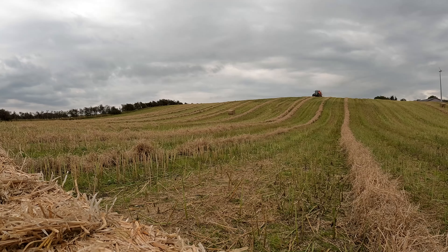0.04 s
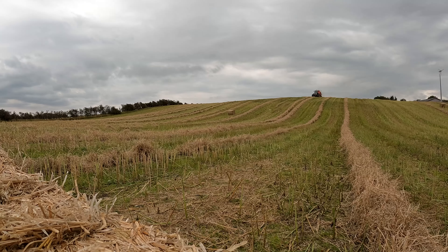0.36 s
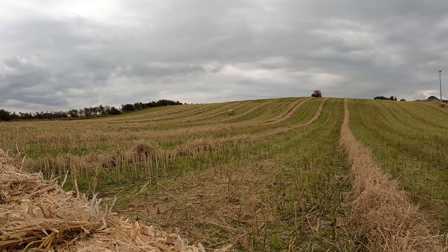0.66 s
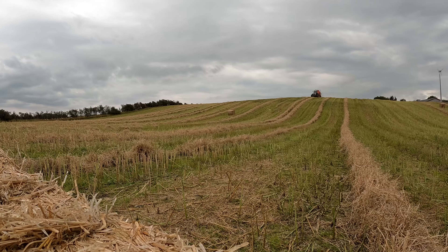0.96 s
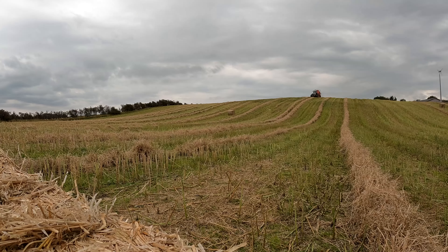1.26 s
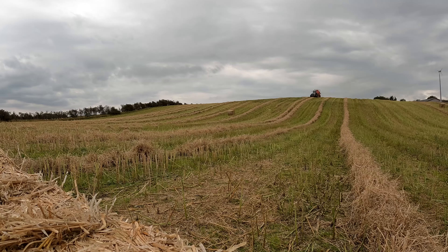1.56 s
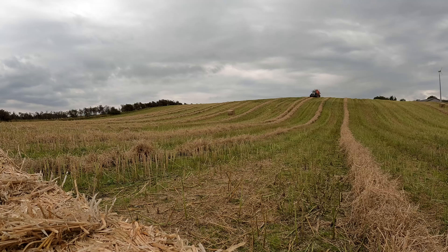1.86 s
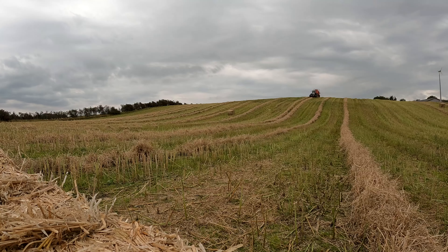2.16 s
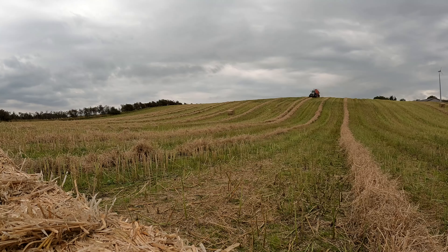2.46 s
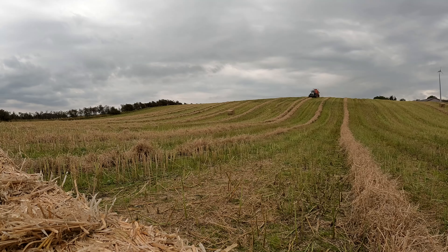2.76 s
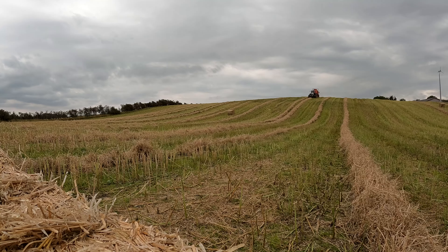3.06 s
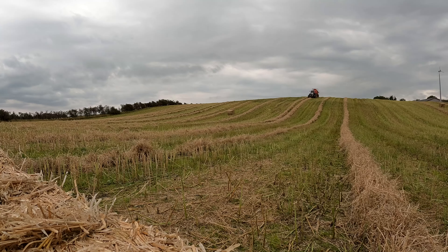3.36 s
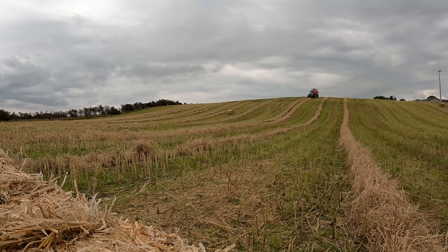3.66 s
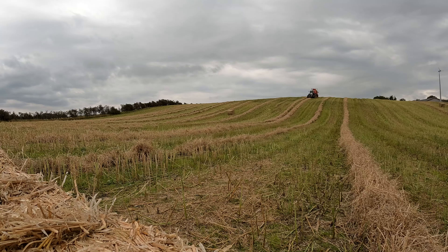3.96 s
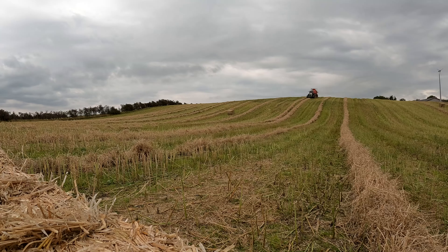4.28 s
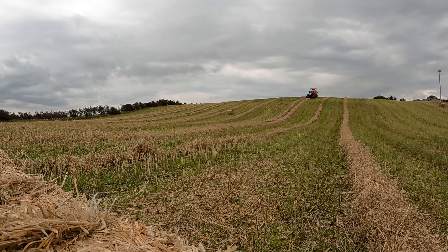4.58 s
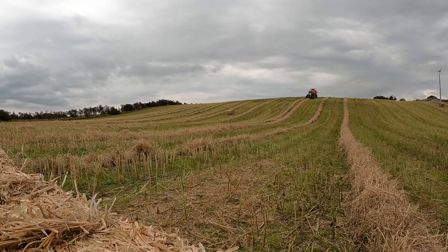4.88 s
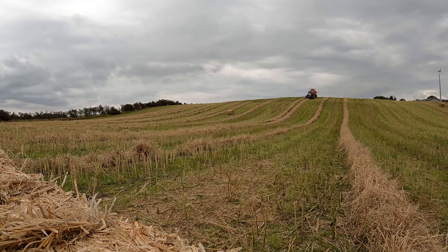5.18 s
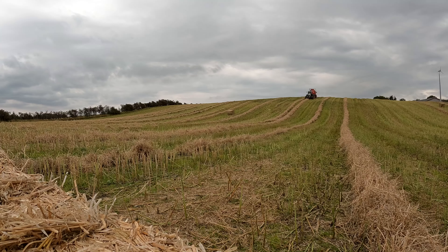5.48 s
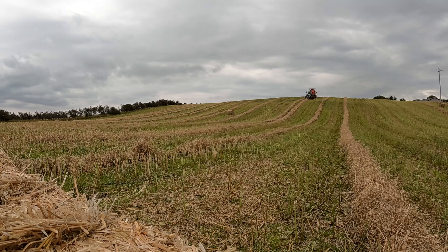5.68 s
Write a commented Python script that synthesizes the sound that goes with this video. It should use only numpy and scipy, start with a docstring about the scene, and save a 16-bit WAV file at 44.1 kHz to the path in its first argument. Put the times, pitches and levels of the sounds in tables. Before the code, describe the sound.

Across a breezy field, a tractor engine labours, eases and labours again, while the baler behind it rattles and swishes through dry straw.

```python
"""A six-cylinder diesel tractor hauls a baler up a stubble field, some way off. From the start its firings make
the exhaust drone and shake the metalwork, straw rustles in the pickup, and wind thumps softly on the
microphone. Near 0.4 s the load drags the speed down: the block knocks, the exhaust barks. By 4 s the engine
runs almost free, knock has given way to rattle, and thin high tones whistle faintly now and then. Around 7 s,
with the breeze dying down, the engine labours again."""
import sys
import numpy as np
from scipy import signal
from scipy.fft import rfft, irfft, next_fast_len
from scipy.io import wavfile
from scipy.ndimage import uniform_filter1d, map_coordinates

SR = 44100
rng = np.random.default_rng(int(sys.argv[2]) if len(sys.argv) > 2 else 0)


def materialize(psi):
    """Save the field psi as 16-bit PCM at rate SR to the path in sys.argv[1].

    A 1-D psi becomes a single channel; in a 2-D psi each row is a channel.
    """
    bounded = np.clip(np.atleast_2d(psi).T, -1, 1)
    quanta = np.round(bounded * 32767).astype(np.int16)
    wavfile.write(sys.argv[1], SR, quanta)


N = 341334

# swell of the machine's midrange as the air carries it: t/s, relative level/dB
BODY_LEVEL = [(0.0, -39), (1.01, -35.5), (2.76, -37.5), (4.12, -40.5), (5.33, -34.5), (6.7, -34.5),
              (7.26, -34.5), (7.41, -34.5), (7.74, -35.5)]
# rides on the machine's treble and the straw's swish: t/s, relative treble/dB, relative straw/dB
TOP_LEVELS = [(0.06, -44, -60), (0.25, -46, -61.5), (0.55, -42, -55.5), (0.82, -45, -53.5),
              (1.2, -46.5, -62.5), (1.4, -47, -59.5), (1.66, -47, -62), (1.99, -39.5, -57.5),
              (2.4, -48.5, -64), (2.7, -46, -61), (2.9, -44, -62), (3.2, -40.5, -60), (3.59, -51, -67.5),
              (4.19, -52.5, -67), (4.95, -50, -58.5), (5.44, -43, -57.5), (5.8, -46.5, -58),
              (6.14, -45.5, -55), (6.8, -45, -60), (7.15, -42, -57), (7.46, -45.5, -61.5),
              (7.7, -41, -56.5)]


def amp(db):
    """Decibels to gain."""
    return np.exp(np.asarray(db) * (np.log(10) / 20))


def unit(x):
    """x at rms 1."""
    return x / np.sqrt(np.mean(x ** 2) + 1e-20)


def curves(rows):
    """One value per sample for each column after the time."""
    s, *cols = np.transpose(rows)
    return [np.interp(np.arange(N) / SR, s, c) for c in cols]


def wobble(rate):
    """A smooth random curve, rate knots a second."""
    knots = rng.standard_normal(int(N * rate / SR) + 4)
    grid = np.arange(0, len(knots), 1 / 10)
    return np.interp(np.arange(N) * rate / SR, grid, map_coordinates(knots, [grid], mode="mirror"))


def around(s, half):
    """The samples that a swell at time s covers."""
    return slice(max(int((s - 3 * abs(half)) * SR), 0), int((s + 3 * abs(half)) * SR) + 1)


def swell(s, half):
    """A bell-shaped envelope that peaks at 1 at time s."""
    shape, span = np.zeros(N), around(s, half)
    shape[span] = np.exp(-((np.arange(*span.indices(N)) / SR - s) / half) ** 2)
    return shape


def filtered(x, response):
    """x through a frequency response."""
    m = next_fast_len(N + SR // 2)
    return irfft(rfft(x, m) * response(np.fft.rfftfreq(m, 1 / SR)), m)[:N]


def coloured(x, points):
    """x through an EQ of (f/Hz, level/dB) points on a log axis, at rms 1."""
    f, db = np.transpose(points)
    return unit(filtered(x, lambda hz: amp(np.interp(np.log(hz + 1), np.log(f + 1), db))))


def resonate(x, modes):
    """x ringing in (f/Hz, width/Hz, level/dB) resonances with deep valleys between, at rms 1."""
    peak = lambda f, c, w: 1 / (1 + ((f - c) / w) ** 2) ** 2
    return unit(filtered(x, lambda f: np.sqrt(sum(amp(db) ** 2 * peak(f, c, w) for c, w, db in modes))))


def ring(drive, hz, width_hz):
    """drive ringing in one resonance whose pitch may wander, at rms 1."""
    carrier = np.exp(2j * np.pi * np.cumsum(np.broadcast_to(hz, len(drive))) / SR)
    pole = np.exp(-2 * np.pi * abs(width_hz) / SR)
    envelope = signal.lfilter([1], [1, -2 * pole, pole ** 2], drive * carrier.conj())
    return unit((envelope * carrier).real)


def engine_load(speed, free_hz=39.24, droop_hz=2.84):
    """The governor gives more fuel the further the speed sags: 0 running free, 1 at full load."""
    return np.tanh(np.maximum(free_hz - speed, 0) / droop_hz)


def lugging(speed, lug_hz=34.2, span_hz=.15):
    """0 while the engine keeps up, abruptly 1 once it is dragged below lug_hz and labours."""
    return .5 + .5 * np.tanh((lug_hz - speed) / span_hz)


def tone(turns, multiple, flutter_db, drift):
    """One engine order near rms 1, a little unsteady in level and phase."""
    phase = multiple * turns + rng.random() + drift * wobble(9)
    return np.sqrt(2) * np.sin(2 * np.pi * phase) * amp(flutter_db * wobble(7))


def exhaust(turns, speed):
    """Three firings a turn drone, louder under load; unequal cylinders growl and the stack puffs."""
    # the firing tone's octave: t/s, level/dB
    octave_level = [(0, -64), (1.2, -54), (1.75, -48), (3.3, -48), (4.6, -49.5), (5.4, -48), (6.1, -47),
                    (6.7, -45), (7.74, -47.5)]
    # the seventh order's hum: t/s, level/dB
    hum_level = [(0, -56), (0.5, -57), (0.8, -50.5), (2.0, -59), (3.0, -56), (4.2, -61), (5.4, -57),
                 (6.2, -59), (6.7, -51), (7.05, -50), (7.35, -43.5), (7.74, -43.5)]
    # tones of the unequal cylinders: multiple of the shaft speed, relative level/dB
    uneven_orders = [(2, -5.5), (2.5, -15), (3.5, -44), (4, -31), (4.5, -33), (5, -9.5), (5.5, -21),
                     (6.5, -29.5), (7.5, -18), (8, -11), (9, -10), (10.5, -24.5), (11, -5), (11.5, -12.5),
                     (12, -6), (13, -7), (13.5, -9), (14, -21), (15, -18), (16.5, -8.5), (17.5, -9),
                     (18.5, -14)]
    # exhaust pipe resonances: f/Hz, width/Hz, boost/dB
    pipe_modes = [(249, 15, 8), (436, 14, 9)]
    # colour of the puffs from the stack: f/Hz, relative level/dB
    puff_eq = [(70, -25), (130, -5), (180, -2), (260, -3), (320, -11), (420, 0), (650, -12), (1200, -40),
               (2500, -120)]
    load, bark = engine_load(speed), lugging(speed)
    body_db = curves(BODY_LEVEL)[0]
    swell_db = body_db - body_db.mean()

    firing_db = -50 + 9.5 * load + .97 * np.arange(N) / SR  # grows as the tractor draws on
    silencer_db = 14.5 / (1 + ((10 * speed - 380.2) / 20.3) ** 2)  # its resonance lifts the tenth order
    boom_db = -58 + .65 * swell_db + silencer_db
    octave_db, hum_db = curves(octave_level)[0], curves(hum_level)[0]
    firing, octave, hum, boom = [tone(turns, k, flutter_db=.8, drift=.003) for k in (3, 6, 7, 10)]
    drone = amp(firing_db) * firing + amp(octave_db) * octave + amp(hum_db) * hum + amp(boom_db) * boom

    growl_db = -57.5 + 12.5 * load + .72 * swell_db + 3 * bark
    push = amp(.5 * (firing_db + 37))  # the low orders swell with the exhaust pressure
    orders = [(k, amp(db) * tone(turns, k, flutter_db=1.2, drift=.02)) for k, db in uneven_orders]
    growl = amp(growl_db) * sum(line * push if k < 10 else line for k, line in orders)
    pipe = lambda f: amp(sum(db / (1 + ((f - c) / w) ** 2) for c, w, db in pipe_modes))

    puff_db = -55 + 7.5 * bark + .72 * swell_db
    puffs = coloured(rng.standard_normal(N) * amp(-26 * (turns % 1)), puff_eq)  # one each turn
    return drone + filtered(growl, pipe) + amp(puff_db) * puffs


def bursts(turns, depth_db, uneven_db):
    """Noise that surges at each firing and dies within the stroke, swelling once a turn."""
    stroke = (3 * turns + rng.random()) % 1
    return rng.standard_normal(N) * unit(amp(uneven_db * np.cos(2 * np.pi * turns) - depth_db * stroke))


def machinery(turns, speed):
    """Knock takes over from free rattle as the load grows; gusts fade the treble in and out."""
    # engine block and panels under load: f/Hz, width/Hz, relative level/dB
    block_modes = [(407, 18, 5), (536, 69, 0.5), (733, 58, -3), (1163, 133, -3), (1460, 130, -8.5),
                   (1720, 62, -2.5), (2175, 220, -9.5), (2790, 83, -11)]
    # gears, chains and covers running freely: f/Hz, width/Hz, relative level/dB
    cover_modes = [(390, 113, 0.5), (536, 38, 9), (727, 140, 2.5), (1174, 250, -2.5), (1594, 100, -4),
                   (2130, 200, -4), (2444, 130, -4)]
    # broad wash between the resonances: f/Hz, relative level/dB
    wash_eq = [(50, -29), (90, 9), (180, 11.5), (260, -9.5), (320, -41), (450, 8), (800, -20), (1500, -5),
               (1900, -16), (2700, -2), (3500, -1), (4200, -8), (5300, -8), (6100, -8), (9000, -37)]
    body_db, treble_db = curves(BODY_LEVEL)[0], curves(TOP_LEVELS)[0]
    knock_share = np.clip((engine_load(speed) - .26) / .74, .08, .95)
    knock = resonate(bursts(turns, depth_db=8.5, uneven_db=1), block_modes)
    rattle = resonate(bursts(turns, depth_db=3, uneven_db=-1), cover_modes)
    wash = coloured(bursts(turns, depth_db=4, uneven_db=2.1), wash_eq)
    clatter = np.sqrt(knock_share) * knock + np.sqrt(1 - knock_share) * rattle
    noise = clatter + amp(-5.5) * wash + amp(-6) * combustion(turns, speed)
    body = filtered(noise, lambda hz: 1 / (1 + (hz / 2300) ** 6))
    treble = patchy(noise - body, depth_db=3.6, width_hz=120, span_s=.45)
    body = patchy(body, depth_db=1.8, width_hz=110, span_s=.6)
    body_gain = amp(body_db - 2.5 + .6 * wobble(14))
    treble_gain = amp(treble_db - 3 + 1.1 * wobble(11))
    return body_gain * unit(body) + treble_gain * unit(treble)


def combustion(turns, speed):
    """The gas rings at each firing; labouring slowly it burns hotter and rings a little higher."""
    # gas in the cylinders at 36 turns a second: f/Hz, width/Hz, relative level/dB
    gas_modes = [(4080, 300, -0.5), (4480, 170, -1), (4950, 170, -3), (5450, 420, -8)]
    gas = resonate(bursts(turns, depth_db=5, uneven_db=1.5), gas_modes)
    pitch_ratio = (36 / speed) ** .3
    return unit(map_coordinates(gas, [np.cumsum(pitch_ratio)], mode="mirror"))


def patchy(x, depth_db, width_hz, span_s):
    """Sound paths over the ground add and cancel in slowly drifting bands."""
    spectra = signal.stft(x, nperseg=1024)[2]
    bins, frames = np.indices(spectra.shape)
    where = [bins * SR / 1024 / width_hz, frames * 512 / SR / span_s]
    patches = map_coordinates(rng.standard_normal((400, 80)), where, order=1, mode="mirror")
    return signal.istft(spectra * amp(depth_db * patches), nperseg=1024)[1][:N]


def air(x):
    """Distance dulls the top by a changing amount."""
    # upper treble lost on the way: t/s, share (below 0 where a gust carries it in)
    treble_loss = [(0, 0.24), (.3, 0.12), (.6, -0.6), (.95, 0.1), (3, 0.46), (6.3, -0.075), (7, 0.25),
                   (7.74, 0.46)]
    below = lambda edge_hz: filtered(x, lambda hz: 1 / np.sqrt(1 + (hz / edge_hz) ** 24))
    share = np.clip(curves(treble_loss)[0], -1, 1)
    return (1 - share) * below(edge_hz=5440) + share * below(edge_hz=3200)


def shaking(turns, repeat_share=.4, cycle_samples=2400):
    """Jolts at each firing, partly alike from one two-turn cycle to the next, so that they rasp."""
    place = ((turns / 2 + .002 * wobble(12)) % 1 * cycle_samples).astype(int)
    pattern = rng.standard_normal(cycle_samples + 1)[place]
    jolts = np.sqrt(repeat_share) * pattern + np.sqrt(1 - repeat_share) * rng.standard_normal(N)
    return jolts * amp(np.cos(2 * np.pi * turns) - 11 * (3 * turns % 1))


def metalwork(turns):
    """The engine shakes gear case, panels, valve gear and bale chamber into ringing."""
    # the gear case's ring: t/s, f/Hz, level/dB
    gear_case = [(0, 1400, -50.5), (0.6, 1416, -45), (0.85, 1440, -53), (1.05, 1390, -47.5),
                 (2.7, 1422, -45), (3.6, 1457, -50.5), (4.5, 1430, -55), (4.9, 1455, -45.5),
                 (5.4, 1430, -44.5), (6.0, 1410, -41.5), (6.6, 1420, -44), (7.15, 1443, -42.5),
                 (7.74, 1375, -44)]
    # the baler's sheet-metal ring: t/s, f/Hz, level/dB
    panels = [(0, 2650, -49.5), (0.4, 2655, -41.5), (0.8, 2620, -43.5), (1.1, 2566, -43),
              (1.4, 2560, -52.5), (1.75, 2590, -44.5), (2.4, 2510, -56), (2.7, 2670, -49.5),
              (3.8, 2450, -69), (4.35, 2505, -56.5), (5.4, 2590, -50), (6.3, 2580, -51.5),
              (6.8, 2540, -50.5), (7.0, 2590, -42), (7.2, 2580, -43.5), (7.4, 2610, -42.5),
              (7.74, 2540, -43.5)]
    # ringing clatter of injectors and valves: t/s, f/Hz, level/dB
    valves = [(0, 3120, -54.5), (0.55, 3170, -45), (1.0, 3100, -51), (1.4, 3160, -55.5), (1.7, 3030, -45.5),
              (2.05, 3050, -47.5), (2.45, 2990, -52), (3.15, 2920, -49), (3.7, 2910, -57), (3.9, 3100, -72),
              (4.6, 3000, -62), (5.0, 2960, -50), (5.45, 2880, -46), (6.2, 3000, -48.5), (6.8, 3130, -57),
              (7.15, 3060, -45.5), (7.4, 3160, -49), (7.7, 3020, -44.5)]
    # hollow rumble of the bale chamber: t/s, f/Hz, level/dB
    bale_chamber = [(0, 656, -45), (1.2, 720, -66), (2.2, 1090, -46), (3.0, 1010, -53.5), (4.3, 855, -60),
                    (5.0, 850, -47), (5.6, 816, -43.5), (6.3, 800, -53), (6.9, 744, -60), (7.74, 800, -46)]
    shake, out = shaking(turns), np.zeros(N)
    for part, width_hz in [(gear_case, 88), (panels, 88), (valves, 150), (bale_chamber, 194)]:
        hz, db = curves(part)
        out += amp(db + 1.7 * wobble(17)) * ring(shake, hz * (1 + .007 * wobble(13)), width_hz)
    return out


def ground(x, relative_width=.05):
    """Direct and reflected sound cancel in a few narrow bands, which come and go."""
    # passing notches: t/s at the middle, half length/s, f/Hz, gain/dB
    notches = [(0.7, 0.3, 1580, -5), (1.3, 0.42, 3620, -8), (1.4, 0.4, 1930, -6), (1.45, 0.25, 2300, -5),
               (1.3, 0.35, 4760, -5), (2.0, 0.35, 3500, -4), (4.1, 0.6, 1880, -3), (4.3, 0.45, 1120, -4),
               (7.2, 0.4, 3700, -4), (7.2, 0.5, 2880, -4)]
    hz, t, spectra = signal.stft(x, SR, nperseg=1024)
    sink_db = sum(db * np.exp(-((t - s) / half) ** 2 - ((hz[:, None] / centre - 1) / relative_width) ** 2)
                  for s, half, centre, db in notches)
    return signal.istft(spectra * amp(sink_db), SR, nperseg=1024)[1][:N]


def crackle(snaps_per_s=130, snap_db=-5):
    """A grainy swish dotted with single stalks breaking, at rms 1."""
    swish = rng.standard_normal(N) * amp(1.9 * wobble(900) + 1.1 * wobble(45))
    snaps = (rng.random(N) < snaps_per_s / SR) * rng.uniform(-1, 1, N)
    return unit(unit(swish) + amp(snap_db) * unit(snaps))


def straw():
    """Dry stalks swish and snap through the pickup; each wad scrapes at its own straying pitch."""
    # colour of the swish: f/Hz, relative level/dB
    swish_eq = [(3000, -23), (5000, -1), (6200, 3.5), (7800, 2), (9000, -2.5), (10000, -11), (11500, -17),
                (15000, -25)]
    # wads swept into the pickup: t/s at the middle, half length/s, f/Hz, relative level/dB
    wads = [(0.13, 0.04, 8500, -68), (0.48, 0.2, 5750, -57), (0.6, 0.09, 7000, -59), (0.76, 0.1, 7900, -58),
            (0.95, 0.025, 8500, -61), (1.04, 0.018, 7800, -58), (1.08, 0.1, 5800, -61),
            (1.36, 0.07, 7600, -64), (1.48, 0.09, 6500, -64), (1.75, 0.06, 8500, -65),
            (1.97, 0.09, 7000, -60), (2.65, 0.05, 7000, -62), (2.75, 0.05, 8300, -64),
            (2.8, 0.2, 5200, -58), (3.13, 0.04, 6500, -58), (3.3, 0.08, 7200, -66), (5.42, 0.16, 4800, -55),
            (5.58, 0.11, 7000, -60), (6.18, 0.12, 7000, -61)]
    bed = patchy(crackle(), depth_db=2, width_hz=300, span_s=.15)
    out = amp(curves(TOP_LEVELS)[1] - 1.5) * coloured(bed, swish_eq)
    rub, stray_hz = crackle(), 300 * wobble(22)
    for s, half, hz, db in wads:
        span = around(s, half)
        scrape = ring(rub[span], hz + stray_hz[span], width_hz=750)
        out[span] += amp(db - 2.5) * swell(s, half)[span] * scrape
    return filtered(out, lambda hz: 1 / np.sqrt(1 + (hz / 10500) ** 16))


def wind_strength():
    """Thump and flapping in dB: short gusts over a slackening, wavering breeze with lulls."""
    # lulls between the gusts: t/s at the middle, half length/s, gain/dB
    lulls = [(0.17, 0.05, -10), (2.98, 0.06, -7), (4.14, 0.04, -7), (4.83, 0.05, -7), (5.8, 0.1, -10),
             (6.14, 0.05, -7), (6.97, 0.17, -13), (7.53, 0.06, -6)]
    # gusts: t/s at the peak, half length/s, relative thump/dB, relative flapping/dB
    gusts = [(0.04, 0.045, -21, -35), (0.33, 0.04, -14, -33), (0.42, 0.04, -15, -31),
             (0.64, 0.04, -14, -34), (0.82, 0.05, -27, -35), (0.98, 0.06, -21, -36), (1.12, 0.07, -20, -44),
             (1.32, 0.04, -21, -39), (1.55, 0.06, -24, -37), (1.73, 0.045, -17, -34),
             (1.89, 0.07, -25, -32), (2.22, 0.06, -22, -38), (2.44, 0.08, -22, -43), (2.75, 0.1, -24, -40),
             (3.26, 0.08, -26, -43), (3.5, 0.03, -33, -37), (3.68, 0.045, -26, -40), (3.9, 0.06, -28, -43),
             (4.25, 0.04, -34, -39), (4.56, 0.06, -25, -46), (5.36, 0.045, -22, -44),
             (5.65, 0.04, -31, -48), (6.0, 0.06, -28, -38), (6.29, 0.05, -29, -44), (6.6, 0.1, -32, -45),
             (7.37, 0.04, -26, -40), (7.7, 0.06, -35, -50)]
    lulls_db = sum(db * swell(s, half) for s, half, db in lulls)
    breeze = amp(-28 - 1.5 * np.arange(N) / SR + 2.2 * wobble(7) + lulls_db)
    thump_power, flap_power = breeze ** 2, (breeze * amp(-13)) ** 2
    for s, half, thump_db, flap_db in gusts:
        shape = swell(s, half)
        thump_power += amp(thump_db) ** 2 * shape
        flap_power += amp(flap_db) ** 2 * shape
    return 10 * np.log10(thump_power), 10 * np.log10(flap_power)


def eddies(eq):
    """Turbulence of even strength, at rms 1."""
    x = coloured(rng.standard_normal(N), eq)
    return unit(x / np.sqrt(uniform_filter1d(x ** 2, size=SR // 12) + .1))


def wind():
    """Slow eddies sway the air at the microphone; each gust adds a deep thump and some flapping."""
    # slow eddies: f/Hz, relative level/dB
    sway_eq = [(1, -8), (3, 0), (8, -1), (20, -10), (30, -30), (60, -80)]
    # deep thump of a gust: f/Hz, relative level/dB
    thump_eq = [(14, -10), (22, 1), (32, 0), (48, -13), (70, -24), (130, -45), (400, -120)]
    # its flapping at the microphone: f/Hz, relative level/dB
    flap_eq = [(30, -14), (50, 0), (70, -4), (100, -10), (150, -19), (250, -31), (600, -70), (1500, -120)]
    thump_db, flap_db = wind_strength()
    sway = np.tanh(coloured(rng.standard_normal(N), sway_eq))
    sub = amp(-7.5 + .29 * thump_db) * coloured(sway, [(13, 0), (20, -12), (32, -50)])
    return sub + amp(thump_db - 1.27) * eddies(thump_eq) + amp(flap_db - 1.6) * eddies(flap_eq)


def hiss():
    """The microphone's faint, steady noise floor."""
    # colour of the hiss: f/Hz, relative level/dB
    hiss_eq = [(100, 4), (8000, -3), (12000, -4.8), (15700, -7.6)]
    return amp(-72.2) * coloured(rng.standard_normal(N), hiss_eq)


def jangles(turns, q=48):
    """Loose parts buzz against each other for a moment, each at its own wavering pitch."""
    # parts ringing up: t/s at the middle, half length/s, f/Hz, level/dB
    loose_parts = [(0.08, 0.19, 5130, -62), (0.526, 0.23, 3420, -47.5), (0.672, 0.18, 4280, -48),
                   (0.62, 0.17, 4930, -50), (0.65, 0.23, 5530, -51.5), (1.054, 0.21, 5100, -53),
                   (1.154, 0.16, 3960, -60), (1.35, 0.16, 4520, -53), (1.514, 0.18, 5030, -54),
                   (2.737, 0.14, 4140, -56), (2.8, 0.15, 4580, -57.5), (3.1, 0.36, 4430, -59),
                   (3.148, 0.12, 5360, -61), (3.203, 0.29, 2680, -50.5), (3.745, 0.3, 2266, -55),
                   (4.1, 0.33, 4930, -70), (5.5, 0.26, 3910, -53), (6.335, 0.15, 4080, -51.5),
                   (6.392, 0.1, 4840, -64), (6.59, 0.57, 2765, -49.5), (6.815, 0.72, 2320, -49),
                   (6.797, 0.26, 3190, -47), (6.9, 0.41, 4110, -53), (7.115, 0.19, 3400, -46),
                   (7.1, 0.13, 4700, -52)]
    shake, out = bursts(turns, depth_db=9, uneven_db=1.5), np.zeros(N)
    waver = 1 + .006 * wobble(16)
    for s, half, hz, db in loose_parts:
        span = around(s, half)
        out[span] += amp(db) * swell(s, half)[span] * ring(shake[span], hz * waver[span], hz / q)
    return out


def squeals():
    """Thin high tones whistle briefly with an unsteady pitch."""
    # faint squeals: t/s at the middle, half length/s, f/Hz, relative level/dB
    faint_notes = [(4.1, 0.3, 4790, -76), (5.72, 0.07, 9690, -82), (5.74, 0.09, 9250, -79),
                   (6.725, 0.18, 9170, -77), (7.37, 0.06, 8470, -74), (7.65, 0.12, 8500, -76)]
    waver_hz, out = 55 * wobble(150), np.zeros(N)
    for s, half, hz, db in faint_notes:
        span = around(s, half)
        note = np.sin(2 * np.pi * np.cumsum(hz + waver_hz[span]) / SR)
        out[span] += amp(db + 12) * swell(s, half)[span] * note
    return out


def scene():
    """The crankshaft drives every engine sound; straw, faint whistles, wind and hiss join it in mono."""
    # crankshaft speed: t/s, f/Hz (turns a second)
    shaft_speed = [(0.0, 35.1), (0.04, 35.2), (0.41, 33.5), (0.58, 34.3), (1.81, 36.9), (2.37, 37.6),
                   (2.67, 36.0), (2.87, 37.1), (4.27, 38.9), (4.63, 39.0), (4.87, 37.6), (5.15, 38.8),
                   (5.71, 38.4), (5.95, 37.6), (6.34, 37.9), (6.76, 35.8), (6.88, 35.5), (6.98, 34.1),
                   (7.14, 33.4), (7.31, 34.6), (7.65, 35.0), (7.74, 35.5)]
    speed = curves(shaft_speed)[0]
    turns = np.cumsum(speed) / SR
    noise_floor = hiss()
    drone = exhaust(turns, speed)
    clatter = ground(air(machinery(turns, speed)) + metalwork(turns))
    return (drone + clatter + jangles(turns) + straw() + squeals() + wind() + noise_floor)[None]


def record(dry):
    """The microphone keeps nothing above its band limit; the sound eases in and out."""
    top_hz, fade_s = 15700, .004
    ease = np.clip(np.minimum(np.arange(N), np.arange(N)[::-1]) / (fade_s * SR), 0, 1)
    return filtered(dry[0] * ease, lambda hz: hz < top_hz)[None]


dry = scene()
out = record(dry)
materialize(out)
```